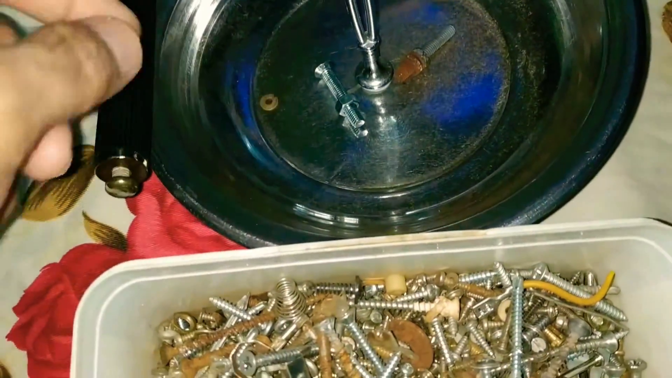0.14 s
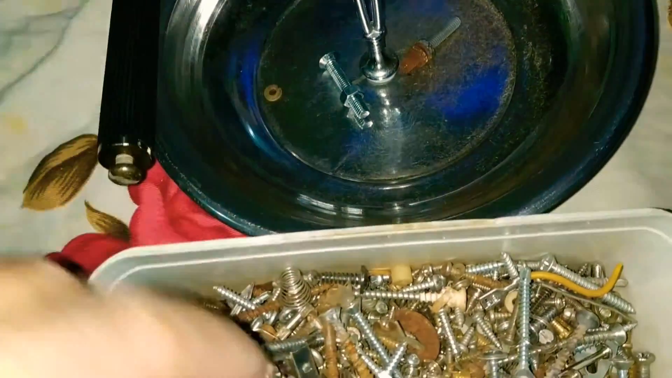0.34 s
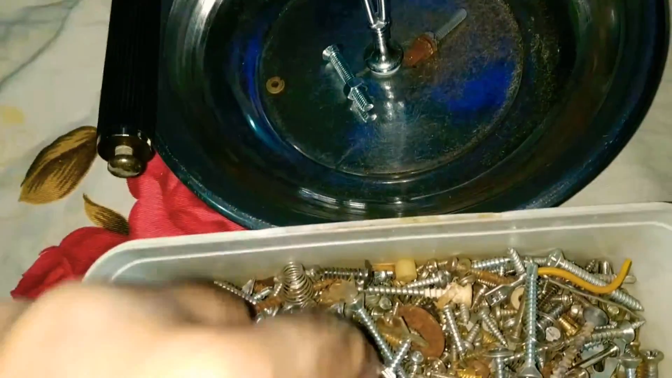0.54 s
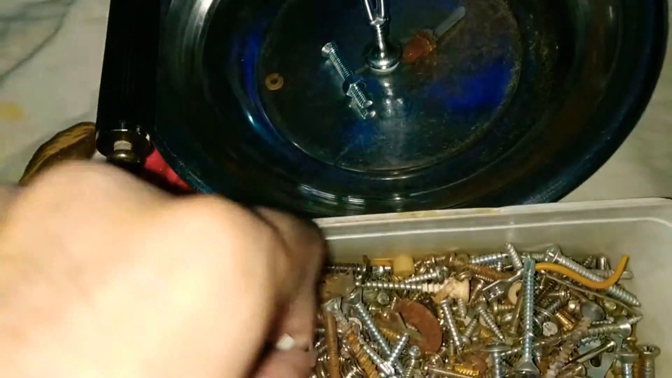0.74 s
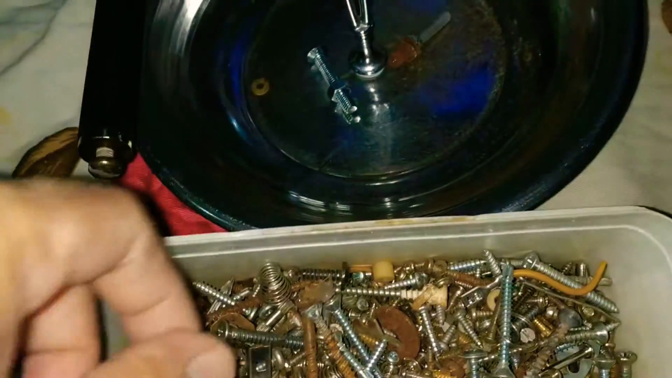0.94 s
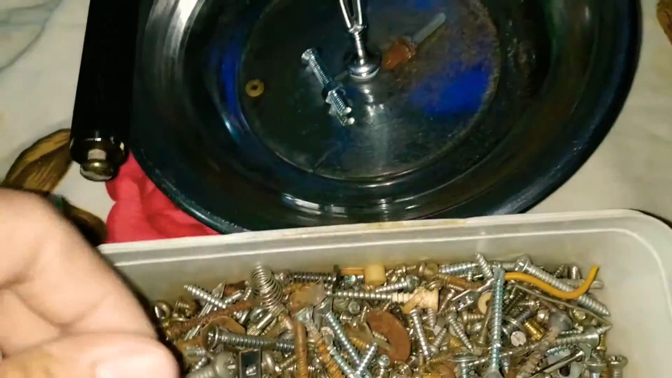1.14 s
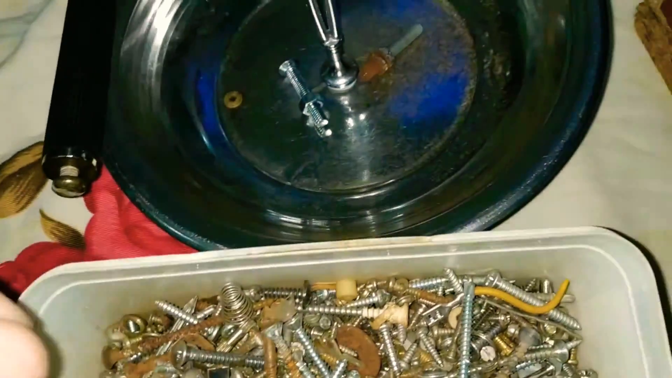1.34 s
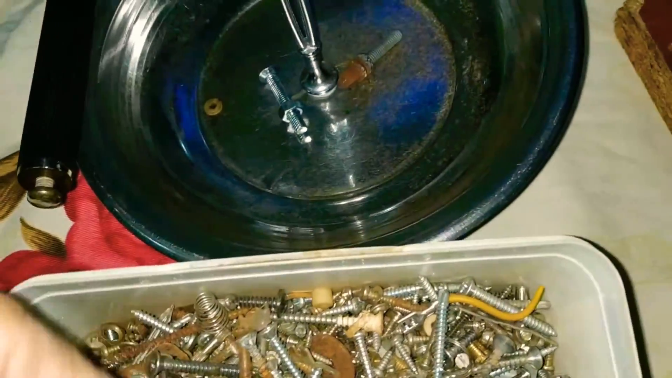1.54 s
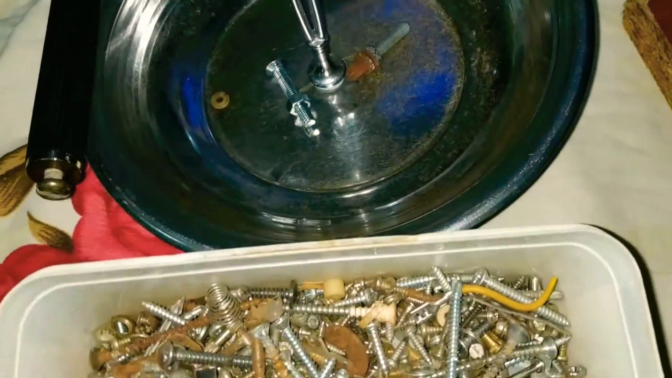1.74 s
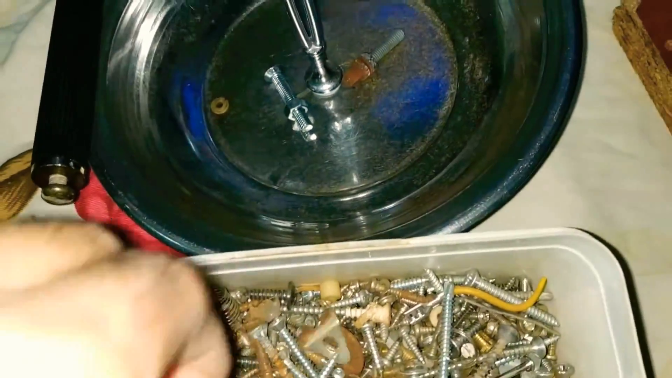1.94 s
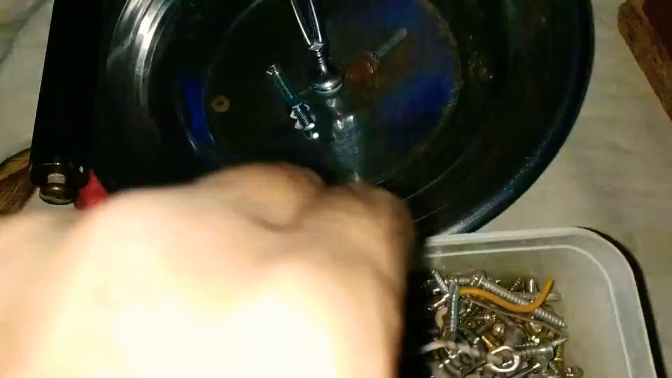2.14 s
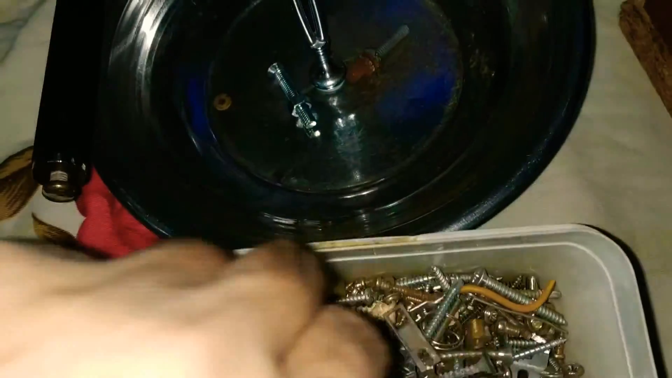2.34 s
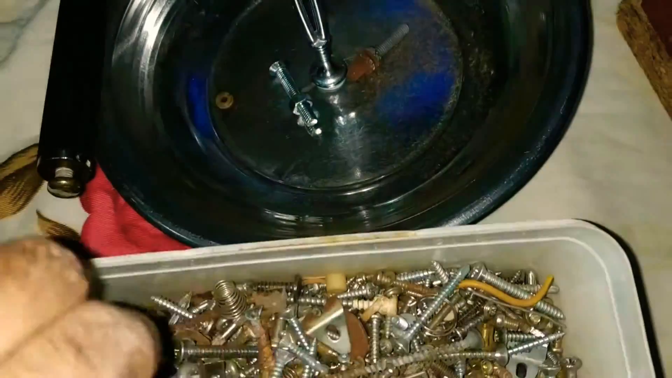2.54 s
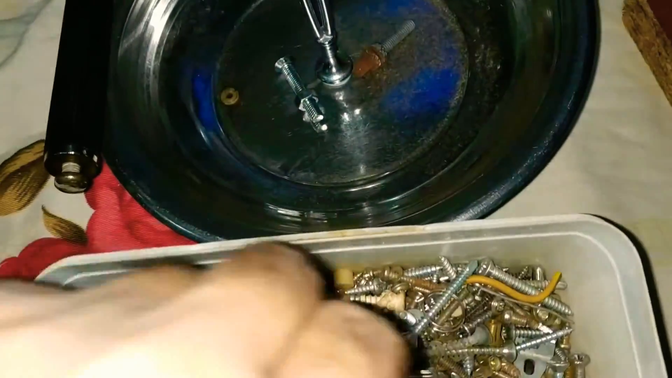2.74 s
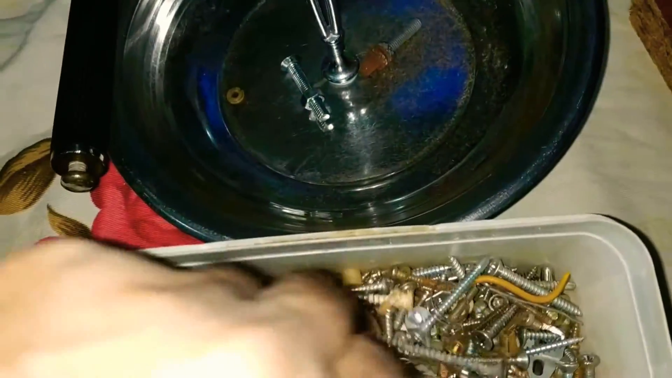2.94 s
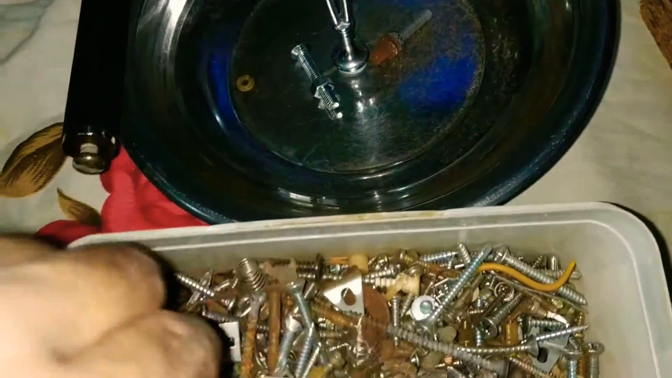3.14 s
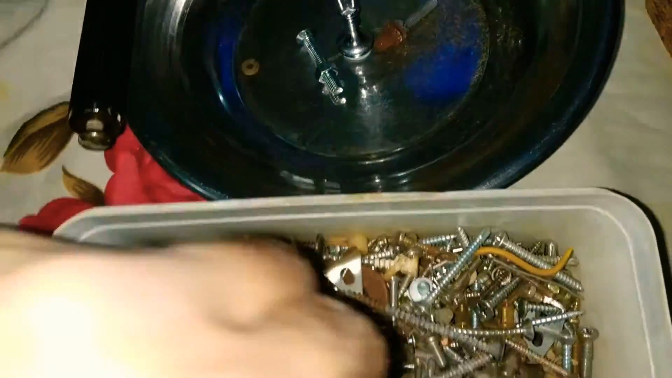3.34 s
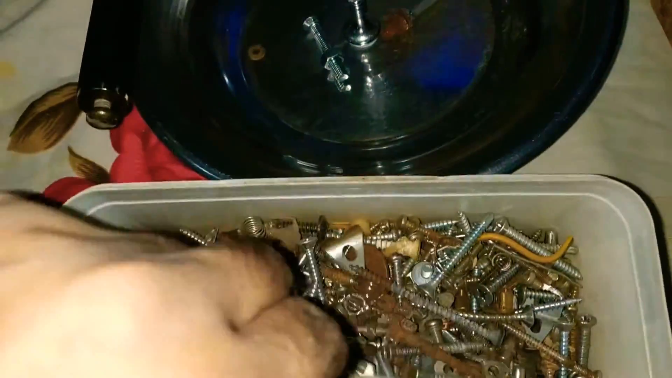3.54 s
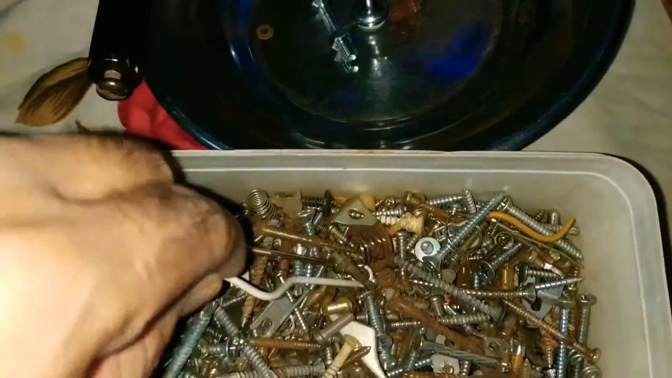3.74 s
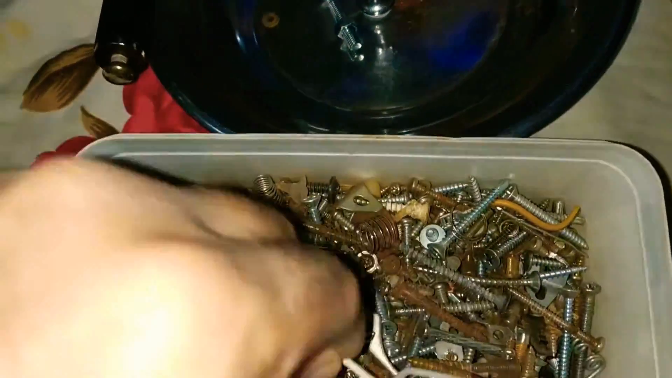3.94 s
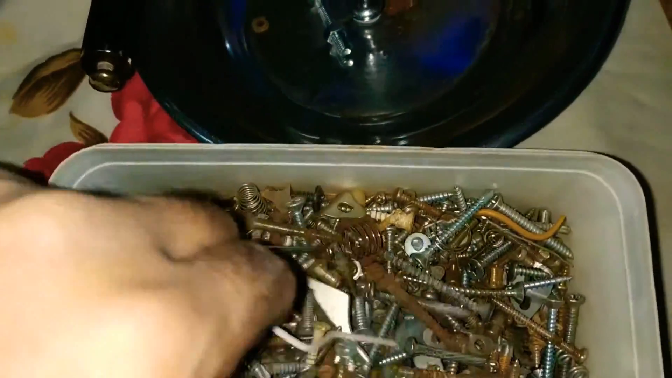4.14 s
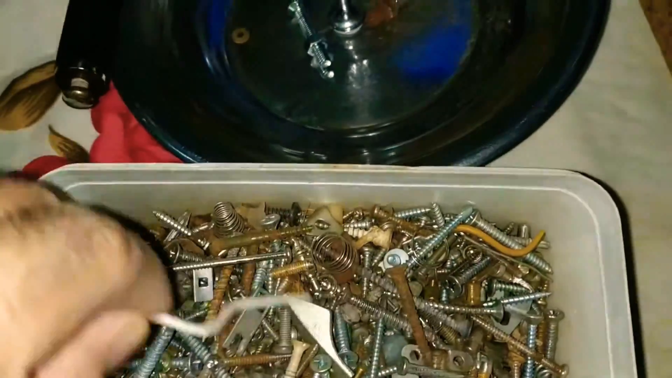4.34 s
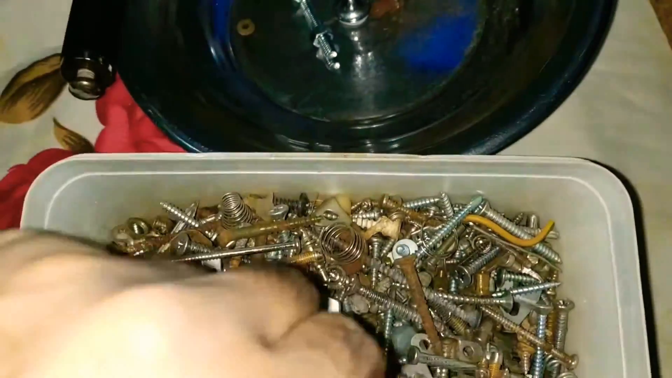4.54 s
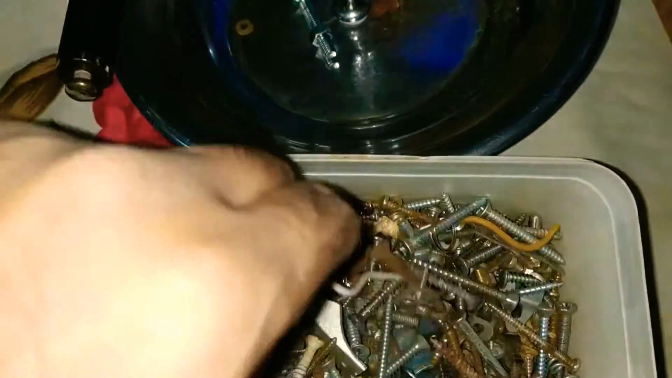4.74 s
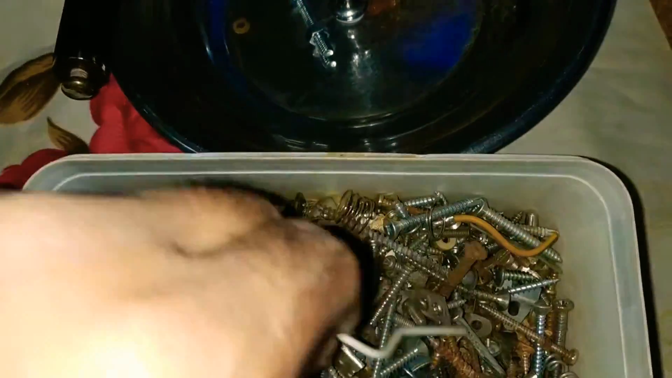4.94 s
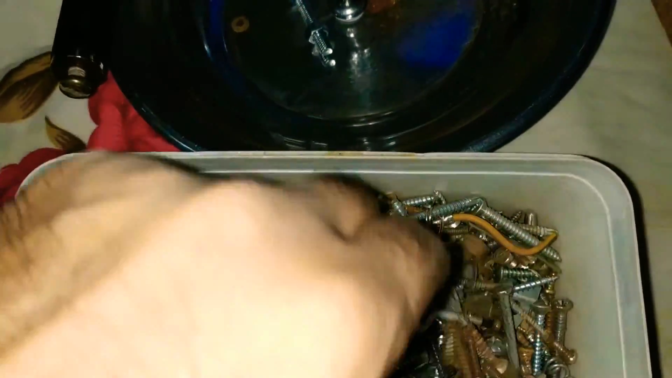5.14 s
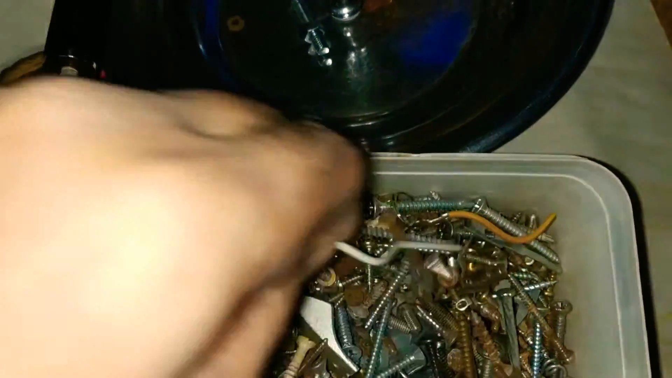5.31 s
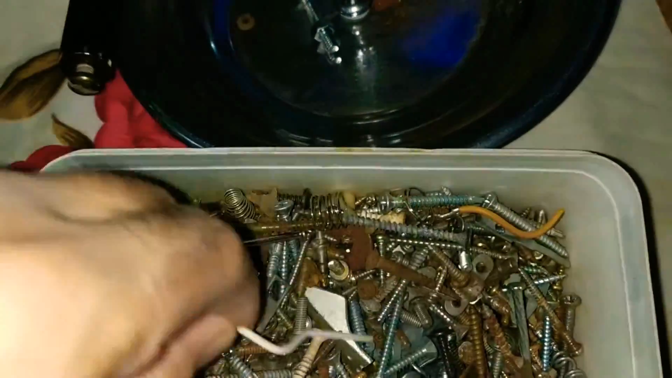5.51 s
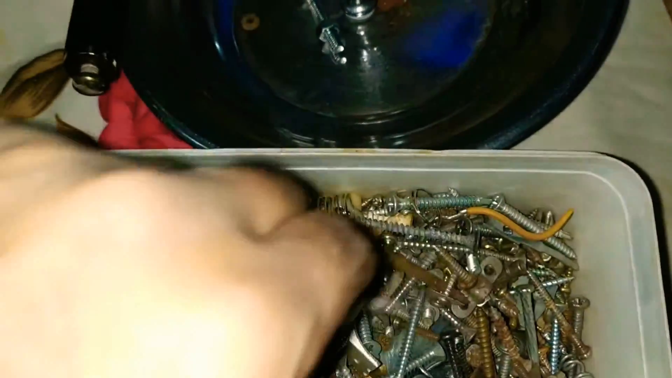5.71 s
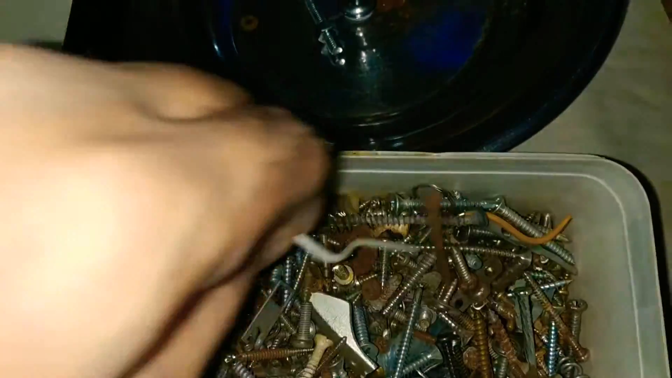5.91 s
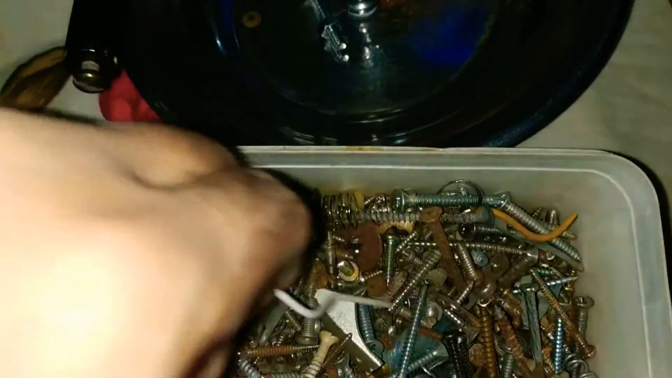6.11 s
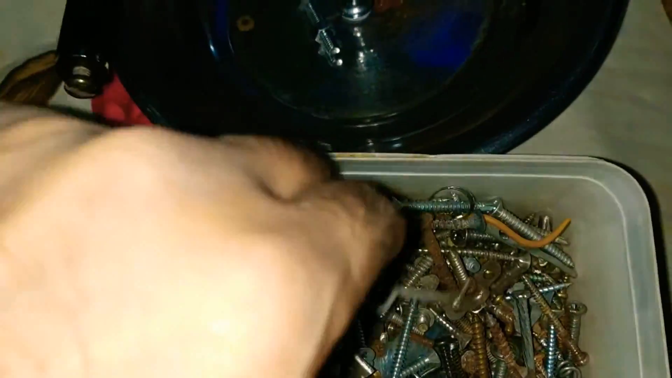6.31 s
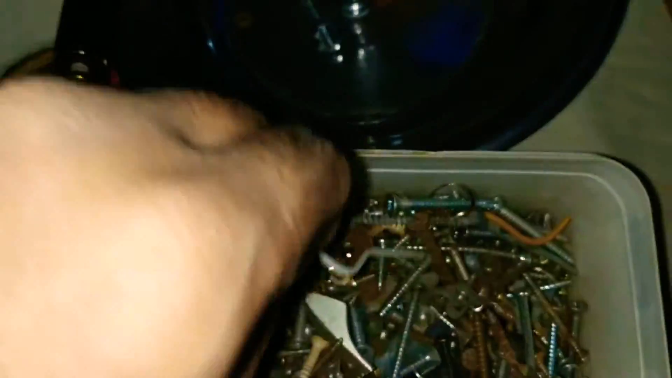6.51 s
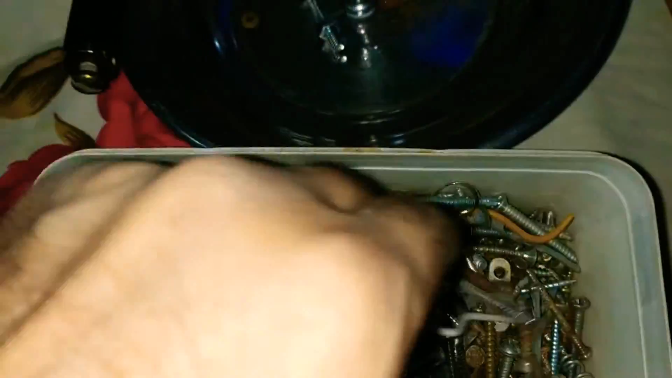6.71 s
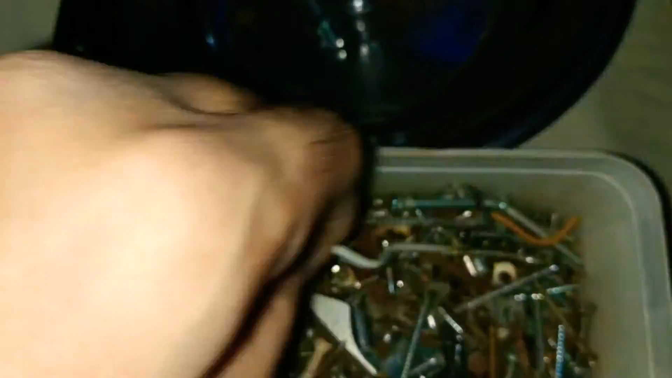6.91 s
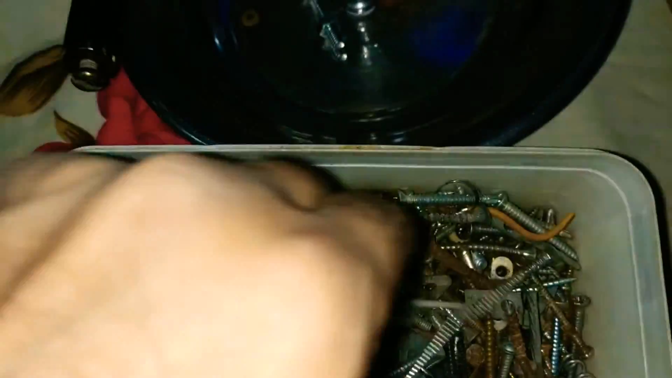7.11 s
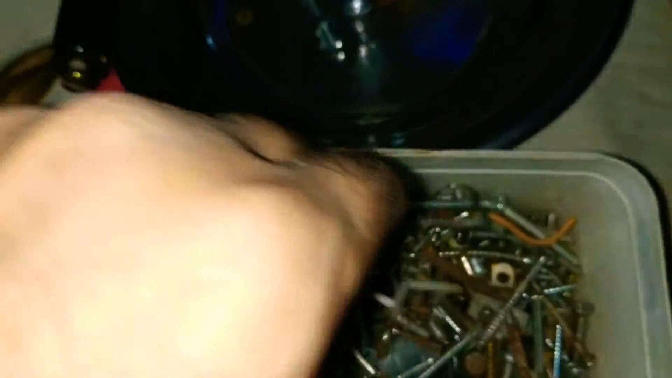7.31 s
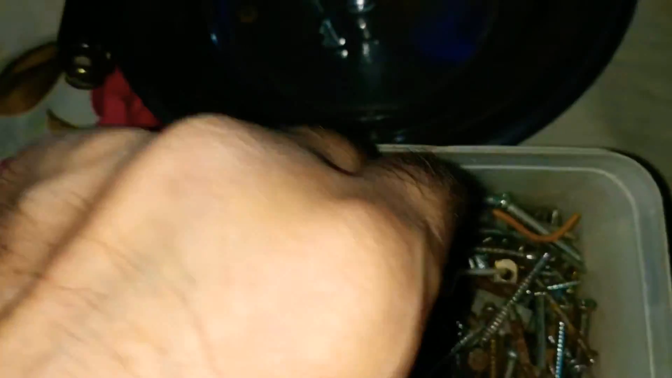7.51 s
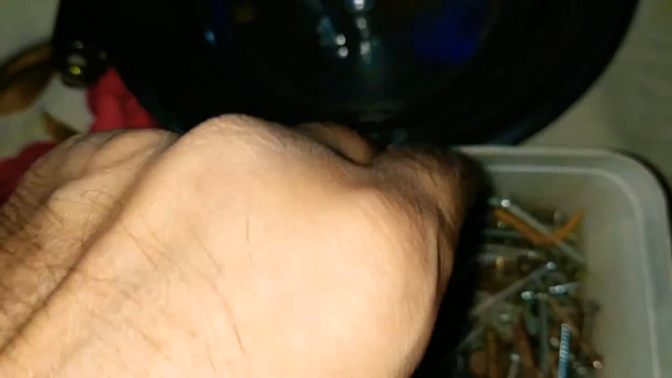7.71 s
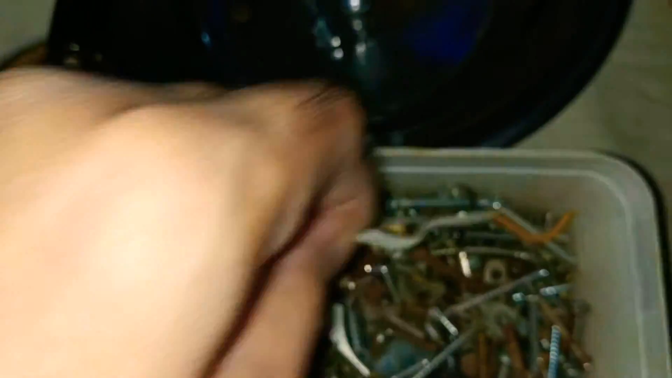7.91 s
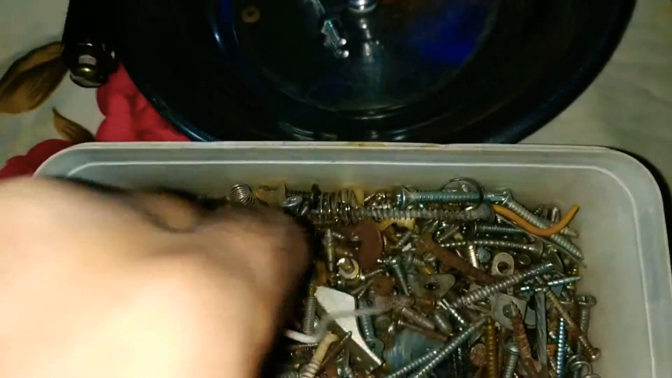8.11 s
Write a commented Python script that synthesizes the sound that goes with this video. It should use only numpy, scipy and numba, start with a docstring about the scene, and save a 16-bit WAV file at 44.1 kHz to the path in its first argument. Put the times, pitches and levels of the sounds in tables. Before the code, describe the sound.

Near-quiet with one faint tick at the start, soft room hiss and distant low rumble. From 0.5 to 1 s, a cluster of clinks and soft knocks on a plastic tub as screws are touched. A short rattle follows near 1.5 s, then light high tinkling around 2 s. At 2.3-2.5 s a brighter stroke sprays screws with shrill, brief rings. From 2.8 to 6 s the hook ploughs repeatedly, each stroke about half a second: gritty sliding, dense metallic clatter, hard clinks near 3.6 and 4.2 s, a clear high ring about 4.7 s, and hollow, dull tub thumps at 5.2 and 5.9 s. A lull follows until 6.6 s, then short rattles at 6.7 and 7.1 s, a dull scrape-knock at 7.7 s and a weak final rustle near 8.2 s. Close, dry and bright, with faint motor hum below.

```python
"""Hook through a tub of screws

A hand drags a bent steel hook through loose screws in a plastic tub, close under a phone in a quiet room.
Each stroke sprays tiny collisions, made of many short decaying sines, with louder clinks on top.
A few pieces ring high under repeated taps; the tub answers low, with soft knocks and dull thumps.
Traffic rumble, a far motor and microphone hiss lie underneath, all shaped from noise."""
import sys
import numpy as np
from scipy import signal
from scipy.fft import rfft, irfft, next_fast_len
from scipy.io import wavfile
from scipy.ndimage import uniform_filter1d
from numba import njit

SR = 44100
rng = np.random.default_rng(int(sys.argv[2]) if len(sys.argv) > 2 else 0)


def dump_mix(stems):
    """Bounce the given channels to the path in sys.argv[1] as a 16-bit WAV at rate SR."""
    frames = np.atleast_2d(stems).T  # one column per channel
    limited = np.clip(frames, -1, 1)  # hard clip at full scale
    pcm = np.round(limited * 32767).astype(np.int16)
    wavfile.write(sys.argv[1], SR, pcm)


N = 364266  # samples
TIME = np.arange(N) / SR  # seconds


def undb(db):
    """Decibels to amplitude."""
    return 10 ** (np.asarray(db) / 20)


def unit(x):
    """Scale x to an RMS of 1."""
    return x / np.sqrt(np.mean(x ** 2))


def curves(table):
    """Columns of a table, drawn as straight lines sample by sample."""
    s, *columns = np.transpose(table)
    return [np.interp(TIME, s, c) for c in columns]


def filtered(x, order, hz, kind="low"):
    """Butterworth low-pass or high-pass."""
    return signal.sosfilt(signal.butter(order, hz, kind, fs=SR, output="sos"), x)


def colour(x, spectrum):
    """Filter x by a gain curve through (frequency [Hz], gain [dB]) points."""
    size = next_fast_len(N)
    hz, db = np.transpose(spectrum)
    bin_hz = np.arange(size // 2 + 1) * SR / size
    gain = undb(np.interp(np.log(bin_hz + 1), np.log(hz), db))
    return irfft(rfft(x, size) * gain, size)[..., :N]


def mode(x, hz, t60):
    """A decaying resonance driven by x; a unit blow rings with a peak near 1."""
    pole = np.exp(2j * np.pi * hz / SR - np.log(1000) / (max(t60, .003) * SR))
    return signal.lfilter([1], [1, -pole], x).imag


@njit
def rings(n, start, lag, hz, t60, rise, turn, left, right):
    """Many short rings that swell over the contact time and decay; each reaches the left port after its lag."""
    out = np.zeros((2, n + 64))
    for k in range(len(start)):
        step = np.exp(2j * np.pi * hz[k] / SR - np.log(1000) / (t60[k] * SR))
        ring = np.exp(2j * np.pi * turn[k])
        closing = np.exp(-1 / (rise * SR))
        closed = 1.
        for i in range(start[k], min(n, start[k] + int(t60[k] * SR))):
            closed *= closing
            out[0, i + lag[k]] += left[k] * ring.real * (1 - closed)
            out[1, i] += right[k] * ring.real * (1 - closed)
            ring *= step
    return out[:, :n]


def strike(s, hz, t60, db, pan_db, rise):
    """Rings at times s [s], each from its own spot in the tub: random left lag and phase."""
    spot, turn = rng.random((len(s), 2)).T
    lag = (0.15 + 9 * spot).astype(np.int64)  # samples
    hz = np.clip(hz, 50., .45 * SR)
    t60 = np.clip(t60 + 0 * s, .0003, 1.)
    left, right = undb(db + pan_db / 2), undb(db - pan_db / 2)
    return rings(N, (s * SR).astype(np.int64), lag, hz, t60, max(rise, 1 / SR), turn, left, right)


def hardness(u, scatter_db):
    """Most contacts are light, a few are hard, none without bound."""
    return -scatter_db * np.log(1 - .97 * u)


# Background swells before trim: (time [s], deep rumble level [dB], low rumble level [dB], motor level [dB])
RUMBLE = [(0.0, -80, -75, -72), (0.76, -67, -72, -72), (0.85, -58.5, -58.5, -84), (1.15, -68, -70, -79.5),
          (2.57, -77, -69.5, -80), (2.85, -65.5, -62, -63.5), (3.52, -73, -61, -63),
          (3.82, -69, -68.5, -72), (4.0, -55, -57.5, -65), (4.09, -73, -59, -67), (4.21, -60, -60, -62),
          (4.26, -74, -64.5, -66), (5.47, -51, -61.5, -68), (5.64, -62.5, -61, -64), (7.55, -75, -68, -63),
          (7.73, -63.5, -63.5, -65), (8.17, -70.5, -69, -74), (8.26, -86, -85, -81)]
# Hum bands of the far motor: (frequency [Hz], approximate width [Hz], relative level [dB])
MOTOR = [(110.4, 2.8, -2.5), (169.9, 4, -1.5)]
# Tone of the room noise and hiss: (frequency [Hz], relative gain [dB])
ROOM = [(12, -53), (20, -20.5), (48, -13), (81, -15), (99, -16.5), (166, -12), (280, -21.5), (313, -27),
        (1200, -33.5), (1340, -35), (2390, -32), (2750, -35.5), (10300, -39), (14300, -37.5)]
ROOM_DB = -65  # RMS level


def background():
    """Noise through low resonances makes rumble and motor, nearly alike at both ports; the hiss differs."""
    deep_db, low_db, motor_db = curves(RUMBLE)
    shared, own = rng.standard_normal(N), rng.standard_normal((2, N))
    alike = filtered(shared, 1, 450)
    apart = filtered(own, 1, 300, "high")
    room = undb(ROOM_DB) * unit(colour(alike + apart, ROOM))

    noise = shared + 0.32 * own
    deep = undb(deep_db + 0.5) * unit(mode(mode(noise, 37.3, 0.16), 37.3, 0.16))
    low = undb(low_db + 2.0) * unit(mode(mode(noise, 61.6, 0.11), 61.6, 0.11))
    motor = 0
    for hz, width, db in MOTOR:
        motor = motor + undb(motor_db + db - 4.5) * unit(mode(noise, hz, 2.6 / width))
    return room + deep + low + motor


# Boom modes of the plastic tub: (nominal frequency [Hz], relative level [dB], decay t60 [s])
TUB = [(205, 0.5, 0.25), (281, -4.5, 0.07), (461.6, -6, 0.048), (641.3, -4.5, 0.055), (738, 2.5, 0.027),
       (799, -7.5, 0.058), (1200, -6, 0.06)]
TUB_HZ = 702  # centre of the boom under clinks and rustle


def tub(s, near_hz, db, pan_db, slope_db=9):
    """The plastic floor and walls boom briefly; a blow wakes most the modes near its own pitch."""
    out = 0
    for hz, mode_db, t60 in TUB:
        u = rng.random((len(s), 3)).T
        octaves_away = np.abs(np.log2(hz / near_hz))
        mix_db = mode_db - slope_db * octaves_away - 6 * u[1]
        mode_hz = hz * (1 + 0.071 * (u[0] - .5))
        out = out + strike(s, mode_hz, t60, db + mix_db, pan_db + 13 * (u[2] - .5), rise=0.0008)
    return out


# Clinks, levels before trim: (time [s], impact level [dB], crack pitch [Hz], crack level [dB],
# tub level [dB], ring pitch [Hz], ring level [dB])
CLINKS = [(0.081, -46, 5300, -51.5, -66, 9500, -82), (0.53, -54.5, 3800, -52.5, -61, 14000, -56),
          (0.54, -39.5, 1830, -53.5, -41, 7470, -64), (0.582, -27.5, 4140, -38, -52, 13600, -35),
          (0.648, -33, 5390, -52, -46.5, 12300, -45), (0.707, -25, 3570, -36.5, -40, 14000, -44),
          (0.781, -31.5, 3850, -38, -61, 10700, -50), (0.849, -30, 2280, -47, -45.5, 7170, -48),
          (0.897, -30, 2320, -50, -43.5, 14000, -54), (0.994, -42, 3180, -78, -58, 14100, -50),
          (1.481, -36, 4170, -54, -48, 13200, -43), (1.674, -40.5, 4060, -60, -60, 9000, -58),
          (1.822, -49, 2130, -71, -74, 8850, -50.5), (1.854, -42, 5030, -57, -62, 10730, -53),
          (1.912, -51, 1900, -61, -51, 12800, -45), (1.938, -39, 2860, -55, -60, 7820, -51),
          (1.957, -37, 2800, -53, -53.5, 7760, -45), (2.012, -41, 2770, -58.5, -68, 7100, -34),
          (2.036, -42, 3820, -61, -65, 7090, -42), (2.076, -39, 6460, -60, -67, 7010, -45),
          (2.104, -31.5, 4720, -61, -63, 7010, -32.5), (2.147, -53, 4060, -62, -71, 7100, -49),
          (2.173, -33.5, 6300, -51, -65, 6940, -42.5), (2.191, -35, 3700, -37, -54, 6960, -60),
          (2.236, -34.5, 3830, -55, -69, 7000, -51), (2.297, -39, 3360, -50, -46, 13800, -33),
          (2.327, -32, 2500, -46, -37.5, 13900, -39), (2.412, -21, 3780, -41, -46, 12070, -24.5),
          (2.581, -44, 5800, -61, -57, 7750, -43.5), (2.816, -39, 3240, -46.5, -54, 13900, -50),
          (2.829, -45, 3360, -41, -56, 7020, -52), (2.849, -32, 2920, -41.5, -45.5, 13800, -36),
          (2.905, -44, 3640, -52, -58, 13900, -41), (2.988, -27, 2950, -32.5, -41, 10700, -38),
          (3.12, -26, 6400, -37, -44, 14000, -37), (3.174, -34, 6370, -53, -60, 7430, -45),
          (3.239, -35.5, 6500, -65, -78, 13840, -40), (3.42, -30.5, 6200, -44, -64, 13800, -40),
          (3.455, -24, 3020, -38.5, -62, 11000, -32.5), (3.52, -42, 2090, -51, -47, 13400, -43),
          (3.54, -25.5, 5870, -49, -42, 7450, -41), (3.565, -32, 5900, -46, -58, 14100, -39),
          (3.589, -16.5, 5170, -30, -32, 10430, -31), (3.633, -22.5, 4870, -44, -39, 13800, -25.5),
          (3.667, -22, 5100, -51, -36.5, 12200, -27), (3.828, -42, 1820, -67, -62, 12300, -50),
          (3.847, -33, 4160, -39.5, -53, 13600, -39), (3.965, -51, 1240, -71, -71, 13600, -56),
          (3.982, -27.5, 4300, -56, -62, 7750, -41), (4.054, -26, 4370, -46, -56, 13800, -43),
          (4.089, -46, 4400, -51, -58, 7260, -45), (4.138, -24, 5700, -46, -65, 7000, -44),
          (4.161, -21, 4930, -34, -62, 14100, -40), (4.194, -16.5, 6500, -35, -51, 12020, -23.5),
          (4.332, -32.5, 4770, -40, -46, 13800, -35), (4.523, -53, 3150, -63, -71, 11400, -53),
          (4.54, -35.5, 5000, -46, -61, 10500, -40), (4.555, -33, 5430, -40, -48, 13900, -39),
          (4.576, -34, 3400, -53, -51, 10110, -27), (4.642, -31.5, 3650, -54, -68, 13800, -33),
          (4.668, -27, 3450, -47, -58, 13900, -35), (4.717, -36, 4450, -58, -61, 10400, -24),
          (4.856, -33, 1790, -59, -53, 13200, -38), (4.878, -30, 1840, -40, -49, 13600, -44),
          (5.076, -29, 4700, -41, -46, 6540, -50), (5.095, -32, 4690, -54, -51, 10360, -41),
          (5.131, -31, 4700, -47, -47, 13400, -36), (5.216, -23, 3080, -31.5, -32, 7060, -40),
          (5.278, -27, 1800, -39, -33, 7440, -40), (5.357, -36, 2910, -59, -63, 12500, -43),
          (5.387, -31, 5500, -56, -49.5, 10800, -39.5), (5.444, -35, 5500, -46, -74, 13400, -38),
          (5.486, -40.5, 6410, -62, -68, 13500, -49), (5.621, -45, 1710, -68, -69, 13800, -51),
          (5.659, -35.5, 5380, -47, -52, 10300, -40), (5.694, -29, 3870, -44, -58, 8000, -44),
          (5.728, -27, 5800, -37, -56, 10800, -44), (5.789, -50, 3790, -56, -67, 10840, -44.5),
          (5.816, -29, 3740, -38, -39, 14100, -50), (5.841, -32, 3040, -34, -30, 6750, -43),
          (5.863, -22, 3030, -23.5, -29, 7690, -44), (5.888, -28, 1760, -33.5, -23, 13800, -39),
          (5.922, -21.5, 3770, -32.5, -31, 13700, -32), (5.967, -34, 2760, -41.5, -45.5, 6500, -47),
          (6.313, -45.5, 5990, -78, -64, 14100, -58), (6.593, -50, 2850, -73, -68, 11300, -52),
          (6.656, -32, 3800, -46, -61, 13900, -43), (6.701, -32, 3330, -45, -47.5, 8000, -32),
          (6.799, -30.5, 2090, -50, -54, 14100, -45), (6.827, -27, 3500, -43.5, -39.5, 6800, -42.5),
          (7.015, -46, 2890, -71, -77, 11400, -57), (7.056, -34, 2860, -47, -62, 10330, -42),
          (7.11, -46, 2840, -50, -68, 8010, -51), (7.127, -41, 5330, -50, -66, 10300, -40),
          (7.158, -33, 3380, -54, -51.5, 10200, -33.5), (7.225, -42, 3750, -58, -71, 14000, -49),
          (7.577, -45.5, 1830, -67, -66, 7200, -68), (7.719, -31, 1200, -66, -47.5, 13300, -53),
          (8.048, -33, 3850, -53, -77, 10560, -41), (8.156, -34.5, 4220, -59, -67, 12350, -49)]
FLURRY_S, FLURRY_FADE_DB_PER_S = .005, 575  # mean lateness of a contact, fade with lateness
CRACK_SPREAD_OCT = 0.85


def clinks():
    """A screw lands in a quick flurry of contacts: short cracks, a boom in the tub and one piece left ringing."""
    s, peak_db, crack_hz, crack_db, tub_db, ring_hz, ring_db = np.transpose(CLINKS)
    pan_db = -1.5 + 9 * (rng.random(len(s)) - .5)  # each lands at its own spot
    out = tub(s, TUB_HZ, tub_db - 0.5, pan_db / 2)
    # the tick of steel on steel
    out = out + strike(s + 0.0017, 6400.0 + 0 * s, 0.00048, peak_db + 6, pan_db, rise=.00003)
    for contact in range(14):
        u = rng.random((len(s), 6)).T
        # a sharp first impact, then the contacts thin out
        late = FLURRY_S * -np.log(1 - u[0]) * (contact > 3)
        fade_db = FLURRY_FADE_DB_PER_S * late + 6 * u[1]
        spot_db = pan_db + 7 * (u[2] - .5)

        clatter_hz = 900 + 14000 * u[3]
        out = out + strike(s + late, clatter_hz, 0.0067, peak_db - 12 - fade_db, spot_db, rise=.0001)
        hz = crack_hz * 2 ** (CRACK_SPREAD_OCT * (u[4] - .5))
        out = out + strike(s + late, hz, 50.0 / crack_hz, crack_db - 3 - fade_db, spot_db, rise=0.000057)
        # neighbours chatter around the ringing piece
        bright_hz = ring_hz * 2 ** (0.58 * (u[3] - .5))
        out = out + strike(s + late, bright_hz, 0.0035, ring_db - 6 - fade_db, spot_db, rise=.0001)
        if contact % 4 == 0:
            # a thread splits the ring into close partials
            hz = ring_hz * (1 + 0.025 * (u[5] - .5))
            partial_db = ring_db - 0.5 - fade_db / 2
            out = out + strike(s + 2 * late, hz, 0.027, partial_db, spot_db, rise=0.000094)
    return out


def spray(rate, scatter_db, spread_s, cycles, count):
    """Rain of tumbling screws: each tumble is a flurry of brief contacts at many pitches."""
    start, size = rng.random((int(rate * N / SR), 2)).T
    out = 0
    for _ in range(count):
        u = rng.random((len(start), 5)).T
        s = start * N / SR - spread_s * np.log(1 - u[0])
        hz = 250 + 15000 * u[1]
        t60 = cycles * (.5 + u[3]) / hz
        db = hardness(size, scatter_db) + hardness(u[2], 0.62)
        out = out + strike(s, hz, t60, db, 8 * (u[4] - .5), rise=.0001)
    return out


def jingle(rate, low_hz, t60):
    """Countless small screws, each ringing an instant at its own high pitch."""
    u = rng.random((int(rate * N / SR), 5)).T
    s = u[0] * N / SR
    hz = low_hz + (14300 - low_hz) * np.sqrt(u[1])
    db = hardness(u[3], 3.5)
    return unit(strike(s, hz, t60 * (.5 + u[2]), db, 8 * (u[4] - .5), rise=0.00051))


# One list for each stroke through the heap, before trim: (time [s], rustle level [dB], treble level [dB])
STIR = [
    [(0.5, -80, -92), (0.588, -50.5, -49), (0.61, -56.5, -62), (0.908, -59, -62), (0.982, -80, -93),
     (0.992, -70, -64), (1.104, -82, -89), (1.158, -60.5, -69), (1.2, -92, -96)],
    [(1.37, -88, -93), (1.412, -64, -68), (1.47, -70, -64), (1.48, -59, -56), (1.494, -49.5, -47.5),
     (1.592, -80, -82), (1.624, -73, -76), (1.672, -63.5, -64), (1.74, -83, -86)],
    [(1.78, -81, -90), (1.808, -68.5, -69), (2.038, -66.5, -55.5), (2.062, -74, -77), (2.116, -60, -44),
     (2.14, -74, -66), (2.184, -55, -62), (2.246, -63, -60), (2.26, -69, -73)],
    [(2.26, -63, -71), (2.304, -48, -44.5), (2.332, -47.5, -38.5), (2.374, -53.5, -48),
     (2.436, -42.5, -33.5), (2.57, -72, -70), (2.582, -66, -56), (2.62, -72, -86), (2.65, -92, -87)],
    [(2.79, -96, -95), (2.82, -54, -59), (2.862, -51, -44), (2.888, -52.5, -53), (2.996, -40.5, -37),
     (3.118, -52.5, -45.5), (3.232, -67.5, -70), (3.236, -64, -48), (3.3, -90, -105)],
    [(3.4, -92, -91), (3.416, -65.5, -66), (3.462, -47, -39), (3.506, -60.5, -57), (3.586, -43, -44.5),
     (3.7, -49, -43), (3.808, -75, -77), (3.854, -55.5, -63), (3.91, -100, -95)],
    [(3.95, -90, -93), (3.984, -51.5, -44), (4.124, -52.5, -53.5), (4.158, -43, -37.5), (4.292, -49, -47),
     (4.322, -58, -65), (4.334, -51, -55), (4.344, -53, -52), (4.42, -81, -95)],
    [(4.51, -92, -93), (4.52, -68, -72), (4.582, -47.5, -40), (4.604, -60, -53), (4.702, -44, -35.5),
     (4.826, -44.5, -52.5), (4.886, -49.5, -48.5), (4.932, -69, -61.5), (5.0, -63, -92)],
    [(5.05, -88, -90), (5.074, -56, -55), (5.148, -47.5, -44), (5.204, -42, -50.5), (5.22, -33, -39.5),
     (5.248, -46, -54), (5.486, -69, -64), (5.534, -92, -99), (5.55, -74, -71)],
    [(5.55, -68, -62.5), (5.604, -70.5, -73), (5.692, -52, -48), (5.738, -49.5, -48.5), (5.772, -67, -63),
     (5.86, -36.5, -51), (5.932, -51, -47), (5.96, -55, -66), (6.08, -67.5, -85)],
    [(6.57, -83, -89), (6.654, -52, -48.5), (6.702, -51.5, -42.5), (6.786, -63, -64.5), (6.8, -53, -55),
     (6.82, -66, -56), (6.83, -46, -48), (6.874, -73, -81), (6.9, -77, -78)],
    [(7.0, -92, -93), (7.02, -68, -70), (7.054, -53, -53.5), (7.146, -59, -54), (7.162, -57, -45.5),
     (7.202, -70, -70), (7.252, -65.5, -63), (7.272, -80, -92), (7.3, -88, -79)],
    [(7.54, -94, -93), (7.582, -55, -71), (7.606, -64.5, -68), (7.688, -66, -92), (7.708, -72, -77),
     (7.724, -43, -55), (7.794, -65.5, -67), (7.806, -78, -91), (7.82, -68, -89)],
    [(8.1, -73, -90), (8.116, -73, -93), (8.126, -72, -81), (8.136, -70, -82), (8.16, -58, -60),
     (8.192, -55.5, -64), (8.216, -55, -60), (8.244, -62.5, -67), (8.26, -76, -78)],
]
# Tone of the grit: (frequency [Hz], relative gain [dB])
HEAP = [(88, -40), (150, -2), (204, -10.5), (375, -15), (651, -6), (991, -11), (1790, -2), (2040, -3.5),
        (2940, 1.5), (4820, -3), (7770, -14.5), (9580, -16), (14300, -11.5)]
TUB_SHARE_DB, HEAP_PAN_DB = -10.5, -1.5  # tub boom against the rustle; left minus right
SPLIT_HZ = 7500  # rustle below, treble above


def heap():
    """Screws slide and knock as the hook ploughs through; harder strokes shake the tub."""
    level_db, treble_db = curves(np.vstack(STIR))
    moving = sum((TIME > stroke[0][0]) & (TIME <= stroke[-1][0]) for stroke in STIR)
    still_db = -40 * uniform_filter1d(1. - moving, size=300)  # nothing stirs between strokes
    level_db, treble_db = level_db + still_db, treble_db + still_db

    tumbling = unit(spray(rate=260, scatter_db=4.0, spread_s=0.0028, cycles=34.0, count=28))
    sliding = unit(spray(rate=2500, scatter_db=1.5, spread_s=.004, cycles=165.0, count=3))
    grit = colour(tumbling + undb(-1.5) * sliding, HEAP)
    low = unit(filtered(grit, 4, SPLIT_HZ))
    high = unit(filtered(grit, 4, SPLIT_HZ, "high"))
    bright = high + undb(-5) * jingle(rate=1600, low_hz=7570.0, t60=0.025)

    # random blows on the tub follow the rustle level
    u = rng.random((int(350 * N / SR), 2)).T
    s = u[0] * (N - 1) / SR
    blow_db = level_db[(s * SR).astype(int)] + TUB_SHARE_DB + hardness(u[1], 4.5)
    body = tub(s, TUB_HZ, blow_db, 0.)

    side = undb(np.array([[HEAP_PAN_DB], [-HEAP_PAN_DB]]) / 2)
    return side * (undb(level_db - 2.5) * low + undb(treble_db - 2.5) * bright) + body


# Fingers knock the wall of the tub, before trim: (time [s], level [dB])
KNOCKS = [(0.541, -43.5), (0.583, -48), (0.708, -39), (0.779, -53), (1.022, -60), (1.153, -55),
          (1.429, -57)]
WALL_HZ = 470


def knocks():
    """Soft blows wake the lower modes of the tub."""
    s, db = np.transpose(KNOCKS)
    return tub(s, WALL_HZ, db + 8.5, 2.4, slope_db=19.5)


# The tub jolts against the table, before trim: (time [s], level [dB], pitch [Hz])
THUMPS = [(0.711, -55, 278), (2.44, -57, 161), (3.627, -65, 253), (4.198, -44.5, 93), (5.215, -45.5, 205),
          (5.861, -44, 186), (5.891, -43, 223), (6.83, -54, 264)]


def thumps():
    """Dull, quickly damped blows: a main tone, the tub modes near it and a faint tone about an octave below."""
    s, db, hz = np.transpose(THUMPS)
    main = strike(s, hz, 0.064, db + 4.0, 0., rise=0.00087)
    boom = tub(s, hz, db + 1.0, 0., slope_db=28)
    under = strike(s, 0.47 * hz, 0.034, db - 18, 0., rise=.002)
    return main + boom + under


# Pieces that ring while they are pushed about: (nominal frequency [Hz], decay t60 [s])
PIECES = [(7020, .07), (7900, .045), (10200, .07), (10850, .05), (12200, .08), (13350, .045), (13950, .06)]
# For each piece the spells in which it is struck, before trim: (start [s], end [s], level [dB])
STRUCK = [
    [(2.07, 2.19, -53), (2.3, 2.35, -48), (2.41, 2.48, -45), (2.96, 3.04, -50), (3.63, 3.67, -46),
     (4.66, 4.79, -53)],
    [(1.94, 2.0, -66), (4.7, 4.75, -37), (6.69, 6.71, -50)],
    [(2.41, 2.47, -54), (3.445, 3.475, -39.5), (4.565, 4.59, -46), (4.68, 4.73, -29.5), (7.15, 7.18, -53)],
    [(2.41, 2.45, -35), (2.99, 3.07, -42), (4.16, 4.22, -50), (4.57, 4.595, -36), (4.7, 4.77, -39),
     (4.89, 4.92, -42.5), (5.39, 5.43, -50), (5.75, 5.8, -54)],
    [(2.32, 2.355, -41), (2.41, 2.46, -30), (2.94, 3.11, -50), (3.655, 3.73, -39), (4.25, 4.31, -44)],
    [(2.3, 2.355, -34), (2.41, 2.47, -42), (4.67, 4.7, -50), (5.91, 5.94, -46)],
    [(2.3, 2.36, -37), (2.4, 2.45, -34), (2.92, 2.99, -38), (3.07, 3.13, -40), (3.63, 3.66, -44),
     (3.7, 3.74, -45), (4.205, 4.3, -36), (4.34, 4.36, -42), (4.56, 4.595, -39), (4.64, 4.71, -41),
     (4.74, 4.79, -43), (4.87, 4.91, -46), (5.12, 5.19, -44), (6.665, 6.715, -41)],
]
SPELL_ARCH_DB = 9.5  # a spell is this much weaker at its ends than in the middle


def pieces():
    """A piece is tapped at random for as long as it lies in the way of the hook."""
    out = 0
    for (hz, t60), spells in zip(PIECES, STRUCK):
        for start, end, db in spells:
            u = rng.random((int(400 * (end - start)) + 1, 4)).T
            s = start + u[0] * (end - start)
            arch_db = -SPELL_ARCH_DB * (2 * u[0] - 1) ** 2
            # many taps overlap in one ring, so each is weaker than their sum
            tap_db = db + arch_db - 7.5 + hardness(u[1], 4.3)
            tap_hz = hz * (1 + 0.0132 * (u[2] - .5))
            out = out + strike(s, tap_hz, t60, tap_db, 8 * (u[3] - .5), rise=0.00033)
    return out


# Balance of the two ports: (frequency [Hz], left minus right [dB])
PORTS = [(60, -3), (110, -9), (200, -0.5), (380, 1), (700, -1.5), (1290, -1), (2380, 5.5), (4400, 7),
         (8120, -12), (15000, 9.5)]


def scene():
    """Mix the near sounds, shaded by the phone's body at each port, with thumps and background."""
    near = filtered(heap() + pieces() + clinks() + knocks(), 2, 170, "high")
    ports = []
    for channel, sign in zip(near, (1, -1)):
        ports.append(colour(channel, [(hz, sign * db / 2) for hz, db in PORTS]))
    return np.array(ports) + thumps() + background()


SHELF_HZ, TOP_HZ = 14350, 15671  # edges of the two treble steps


def record(dry):
    """The phone drops the highest treble in two steps, by at least 33 dB and then a further 60 dB."""
    shelf = signal.ellip(6, .2, 33, SHELF_HZ, fs=SR, output="sos")
    top = signal.ellip(10, .2, 60, TOP_HZ, fs=SR, output="sos")
    return signal.sosfilt(top, signal.sosfilt(shelf, dry))


dry = scene()
out = record(dry)
dump_mix(out)
```